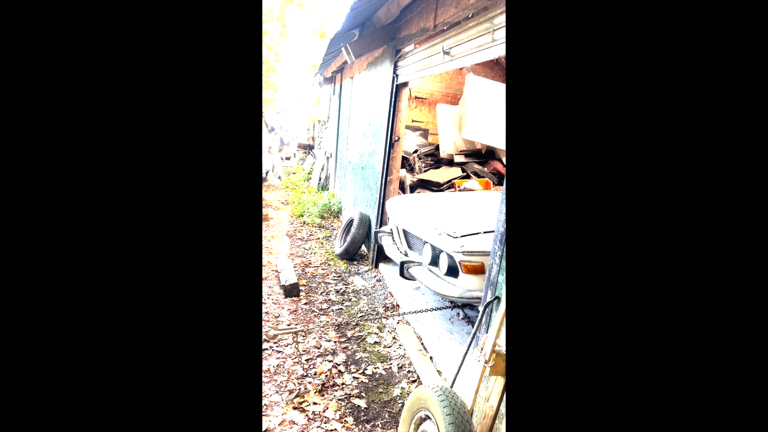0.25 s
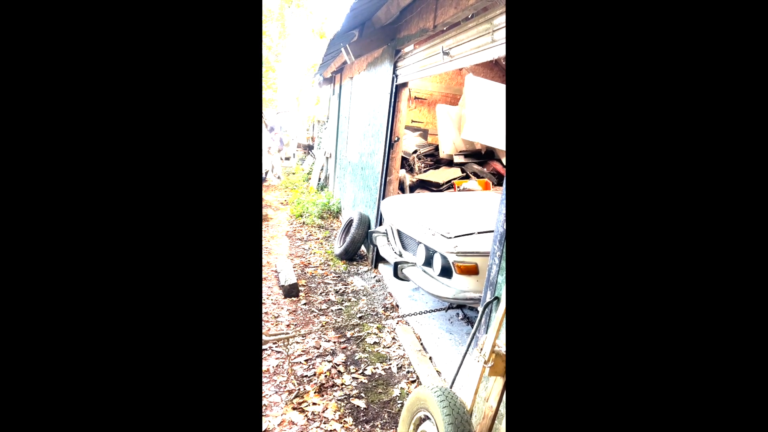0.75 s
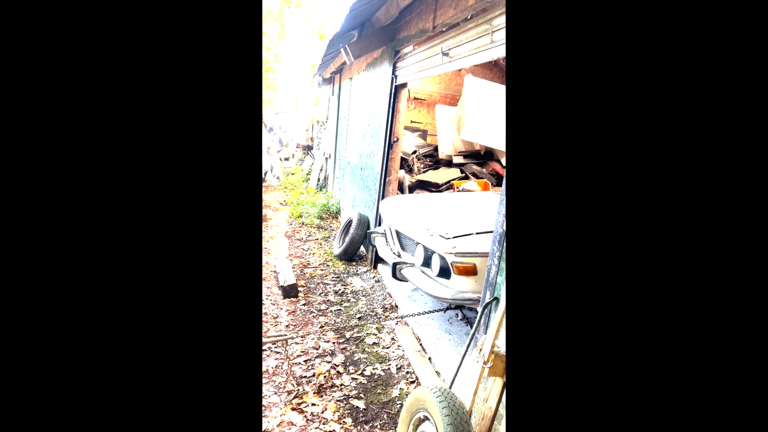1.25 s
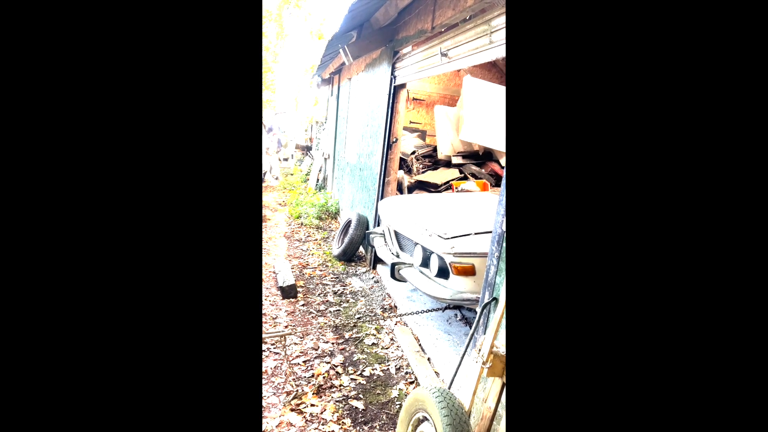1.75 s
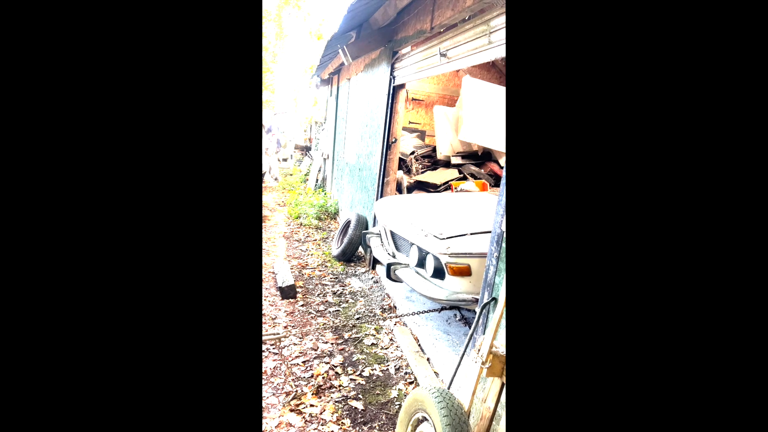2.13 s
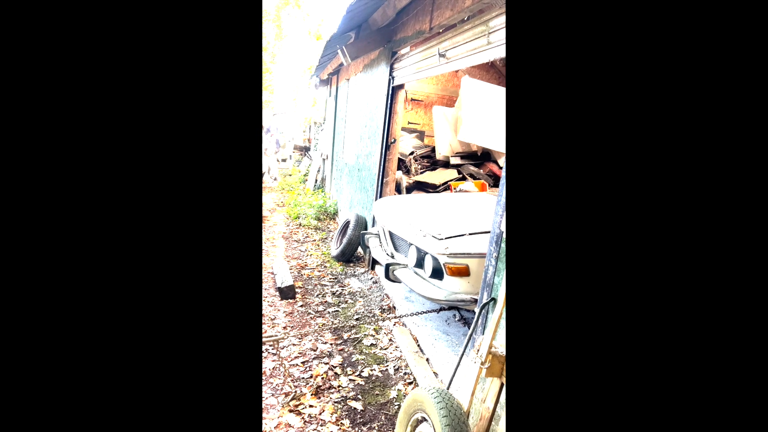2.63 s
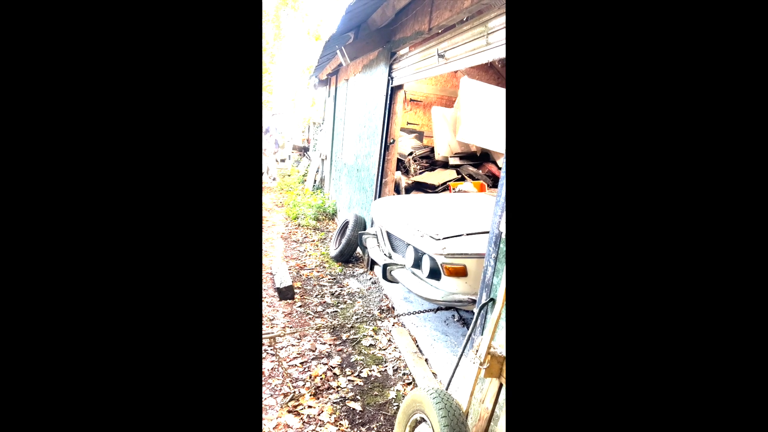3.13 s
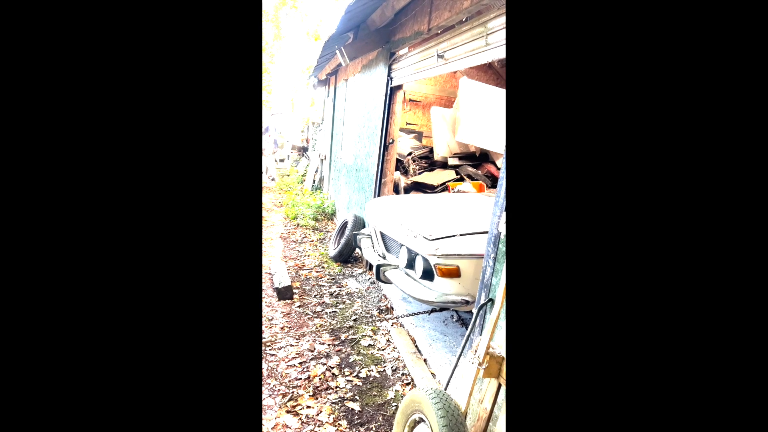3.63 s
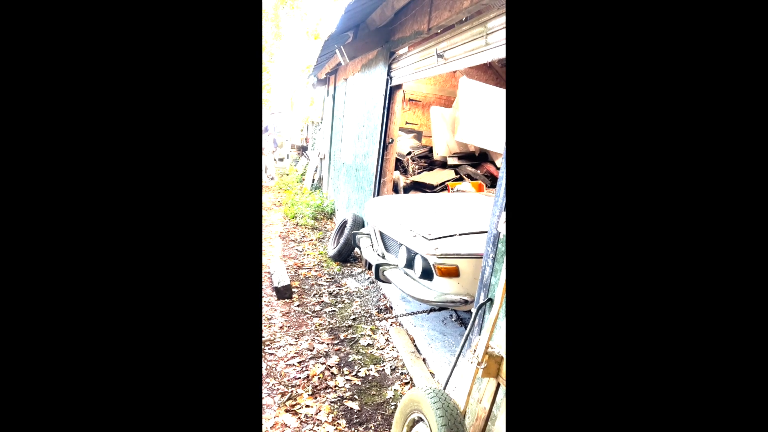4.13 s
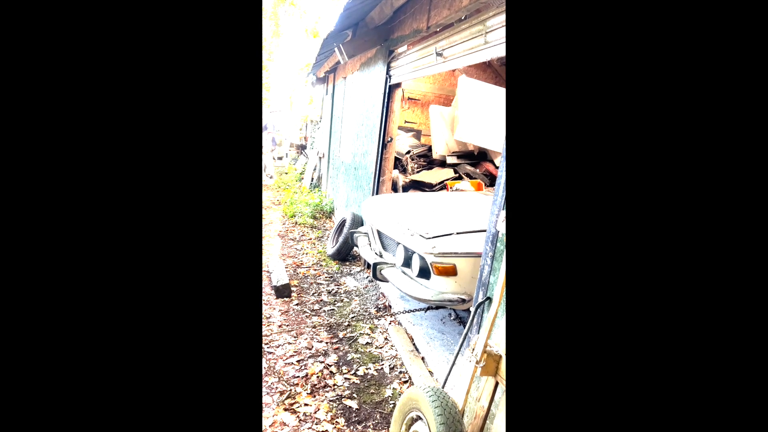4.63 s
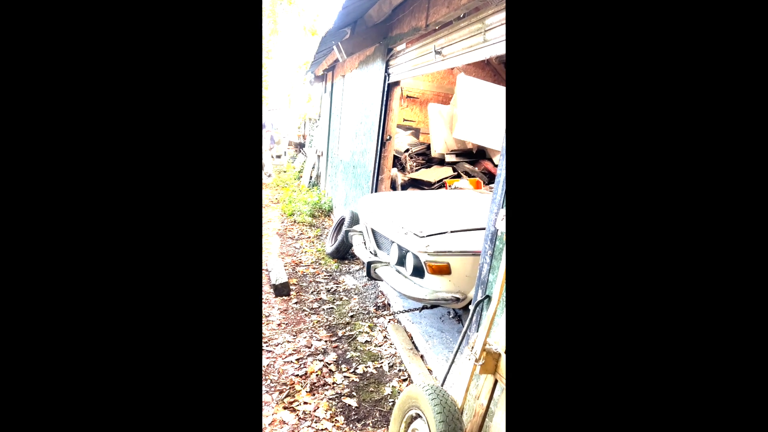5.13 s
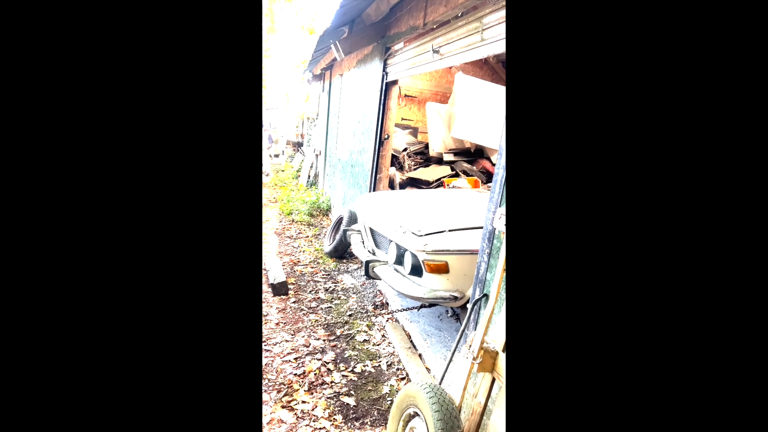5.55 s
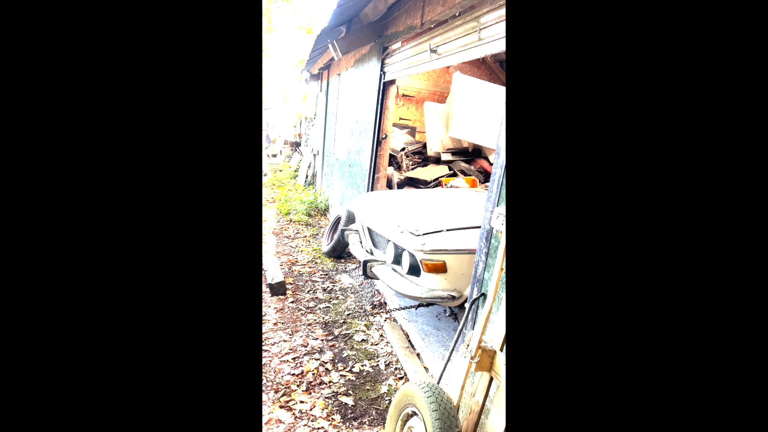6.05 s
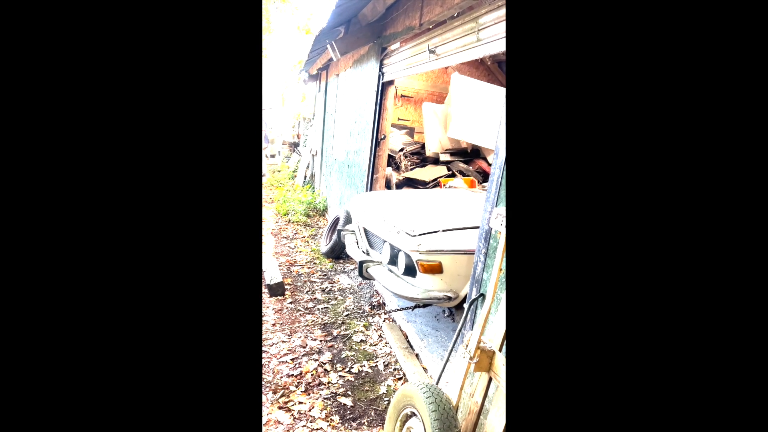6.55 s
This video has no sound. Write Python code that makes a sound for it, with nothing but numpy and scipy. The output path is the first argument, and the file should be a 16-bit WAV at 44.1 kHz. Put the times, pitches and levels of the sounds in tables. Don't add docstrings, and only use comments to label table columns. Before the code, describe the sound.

A low, slightly uneven engine idle hums throughout, with soft valve clatter, and light wind buffets the microphone until about 1.5 s. Close by, a hand winch knocks at 0.06 s and rasps until 0.65 s, gears whining, drum scraping and squealing, with a firm deck thud near 0.5 s and a small creak as it eases. A second stroke runs 1.43-2.05 s, ending in a grinding slip and creak. The third, 2.68-3.45 s, is longer, with dense squealing scrapes, a soft thud at 3.15 s, a bright chain ping at 3.3 s, then knocks and settling creaks. The fourth, 4.2-4.9 s, is harsh, with the hardest deck thud at 4.78 s. The engine hums almost alone until a shorter stroke at 5.83-6.35 s, followed by the strongest creaks, a knock at 6.43 s and faint settling. The open yard adds a short, diffuse reflection.

```python
import sys
import numpy as np
from scipy import signal
from scipy.fft import rfft, irfft, next_fast_len
from scipy.io import wavfile
from scipy.ndimage import uniform_filter1d, map_coordinates

SR = 44100
rng = np.random.default_rng(int(sys.argv[2]) if len(sys.argv) > 2 else 0)


def dump_mix(stems):
    frames = np.atleast_2d(stems).T
    limited = np.clip(frames, -1, 1)
    pcm = np.round(limited * 32767).astype(np.int16)
    wavfile.write(sys.argv[1], SR, pcm)


def attenuation_scalar(level_db):
    decades = np.asarray(level_db, float) / 20
    return 10 ** decades


N = 298998

# (frequency [Hz], density [dB per Hz])
HISS = [(3000, -60), (5000, -2), (6500, -2), (9000, -4.5), (13000, -12.5), (13900, -6), (15600, -26)]
# (frequency [Hz], width [Hz], level [dB])
HOUSING = [(646, 36, 5), (790, 40, 4), (1250, 40, 3), (1380, 40, 6), (1593, 40, 4), (2070, 34, 4),
           (2365, 24, 9), (2450, 30, 6), (2757, 50, 9), (3120, 40, 4), (3620, 50, 6), (4250, 50, 9),
           (4650, 50, 6), (5100, 60, 5)]
# (centre [s], grind [dB], ring over grind [dB], hiss over grind [dB])
SCRAPES = [(.198, -36, -3, -7), (.25, -33, -3.5, -19), (.35, -23.5, -0.5, -15), (.469, -26, 0, -10.5),
           (0.568, -29, 1, -25), (.651, -35, 3.5, -6), (1.779, -35, -2, -21), (1.859, -27.5, -4, -27),
           (1.94, -27.5, -3, -11), (2.87, -30.5, -10, -25), (2.967, -29, -4, -19), (3.039, -33, -3.5, -11),
           (3.137, -22.5, -10, -10), (3.217, -29.5, -0.5, -6), (3.292, -27, 0, -10), (3.371, -25, 0.5, -5),
           (3.486, -34, -0.5, -13), (4.356, -31, -8, -13), (4.482, -26, -2.5, -11), (4.602, -25, -0.5, -15),
           (4.718, -25, -0.5, -6), (4.786, -24, -12, -7), (4.847, -26.5, -0.5, -6.5),
           (6.113, -32.5, -3.5, -13), (6.237, -31.5, -2.5, -26), (6.316, -27.5, -9, -12)]
SCRAPE_S = 0.027


def unit(x):
    return x / np.sqrt(np.mean(x ** 2) + 1e-20)


def along(points, hz):
    f, v = np.transpose(points)
    return np.interp(np.log(hz + 1), np.log(f + 1), v)


def curves(rows, outside=None):
    s, *cols = np.transpose(rows)
    t = np.arange(N) / SR
    return [np.interp(t, s, c, outside, outside) for c in cols]


def wobble(rate):
    coarse = np.arange(0, N + 16, 16)
    knots = rng.standard_normal(int(N * rate / SR) + 4)
    return np.interp(np.arange(N), coarse, map_coordinates(knots, [coarse * rate / SR]))


def filtered(x, response):
    m = next_fast_len(N + SR // 2)
    spectrum = rfft(x, m) * response(np.fft.rfftfreq(m, 1 / SR))
    return irfft(spectrum, m)[..., :N]


def modes(table):
    def mode(f, centre, width, db):
        damping = 1j * f * abs(width)
        return attenuation_scalar(db) * damping / (centre * centre - f * f + damping)
    return lambda f: sum(mode(f, *row) for row in table)


def grit(spectrum, grain_db, rate):
    grains = rng.standard_normal(N) * attenuation_scalar(grain_db * wobble(rate))
    return unit(filtered(grains, lambda f: attenuation_scalar(along(spectrum, f))))


def bursts(centres, lengths, dbs, lag=0, rise=0.5, fall=0.66):
    out, t = np.zeros(N), np.arange(N) / SR
    for s, length, db in zip(centres, lengths, dbs):
        near = slice(max(0, int((s - .1) * SR)), int((s + .25) * SR))
        u = (t[near] - s - lag) / length
        out[near] += attenuation_scalar(db) * np.exp(-(u / np.where(u < 0, rise, fall)) ** 2)
    return out


def breeze():
    # (time [s], level [dB])
    strength = [(0, -52), (.3, -43), (.75, -49), (.9, -44), (1.15, -45.5), (1.4, -55), (2.2, -61), (3, -63),
                (6.78, -70)]
    # (frequency [Hz], density [dB per Hz])
    buffet = [(20, -22), (60, -5), (110, -3), (250, -26), (600, -90)]
    ports = np.array([grit(buffet, grain_db=6, rate=5.68) for port in range(2)])
    return attenuation_scalar(curves(strength)[0]) * ports


def engine():
    # (time [s], firing rate [1/s], exhaust level [dB])
    idle = [(0.0, 32.1, -34.5), (1.04, 32.6, -35), (2.77, 32.4, -35), (2.83, 31.6, -33),
            (4.15, 32.9, -36.5), (4.55, 32.1, -33), (5.53, 32.7, -35.5), (6.78, 32.1, -35)]
    # (multiple of the cycle rate [1], level [dB])
    orders = [(3, -26), (5, -2.5), (6, -7), (8, -22), (9, -5), (12, -8.5), (15, -10), (21, -10), (31, -32),
              (38, -22.5)]
    # (frequency [Hz], density [dB per Hz])
    noise_spectrum = [(30, -13), (60, 0.5), (150, -9), (250, -13), (330, -19), (800, -22.5), (1250, -18),
                      (1800, -27), (3000, -29), (4000, -37.5), (5200, -35), (7000, -47), (13000, -49.5),
                      (15500, -42)]
    # (frequency [Hz], share [1])
    clatter = [(150, .3), (700, .5), (1250, .9), (3000, .5), (6000, .15), (16000, .1)]
    lope_db = 1.5

    firing_hz, level_db = curves(idle)
    exhaust_db = level_db + lope_db * wobble(5)
    cycle = 2 * np.pi * np.cumsum(uniform_filter1d(firing_hz, SR)) / SR / 3
    tones = np.zeros(N)
    for k, db in orders:
        tones += attenuation_scalar(db + 2.3 * wobble(6)) * np.sin(k * cycle + 1.3 * k + .5 * wobble(5))

    firing = np.exp(.45 * np.cos(3 * cycle + .3 * wobble(20)) + .1 * wobble(12))
    share = lambda f: np.clip(along(clatter, f), 0, 1)
    split = lambda f: attenuation_scalar(along(noise_spectrum, f)) * np.sqrt([share(f), 1 - share(f)])
    pair = np.array([unit(firing * rng.standard_normal(N)), rng.standard_normal(N)])
    noise = unit(filtered(pair, split).sum(axis=0))
    return attenuation_scalar(exhaust_db) * tones + attenuation_scalar(-37.5 + 0.24 * (exhaust_db + 34.0)) * noise


def frame():
    # (centre [s], length [s], slip rate [1/s], level [dB])
    creaks = [
        (.675, .04, 503, -41),
        (2.13, .05, 590, -41),
        (3.5, .04, 505, -41),
        (3.6, .1, 598, -48),
        (3.705, .03, 480, -43),
        (6.34, .06, 505, -31),
        (6.46, .05, 575, -35),
        (6.62, .05, 1010, -46),
    ]
    # (frequency [Hz], width [Hz], level [dB])
    joints = [(505, 30, 10), (620, 90, 6), (1040, 150, 3), (1600, 300, 4), (2200, 300, 4), (2980, 460, -8)]
    # (time [s], peak level [dB])
    thuds = [
        (.36, -31),
        (.485, -20.5),
        (3.145, -28.5),
        (4.779, -13),
    ]
    # (frequency [Hz], level [dB], t60 [s])
    deck = [(177, -4, 0.074), (258.4, -1.5, 0.068), (348, -3, 0.096), (1005, -20, 0.091)]

    s, length, hz, db = np.transpose(creaks)
    nearest = np.searchsorted((s[1:] + s[:-1]) / 2, np.arange(N) / SR)
    slip_count = np.floor(np.cumsum(hz[nearest] * (1 + .008 * wobble(60))) / SR)
    slips = np.diff(slip_count, prepend=0) * attenuation_scalar(1.2 * rng.standard_normal(N))
    soft = lambda f: modes(joints)(f) / (1 + 1j * f / 4200) ** 3
    out = bursts(s, length, db) * unit(filtered(slips, soft))

    t = np.arange(SR // 4) / SR
    for start, peak_db in thuds:
        ring = sum(attenuation_scalar(level - 60 * t / t60) * np.sin(2 * np.pi * f * t) for f, level, t60 in deck)
        out[round(start * SR):][:len(t)] += attenuation_scalar(peak_db + 4.5) * ring * (1 - np.exp(-t / 0.0082))
    return out


def chain():
    # (time [s], peak level [dB])
    pings = [
        (0.6764, -47),
        (1.7835, -48),
        (1.9598, -44),
        (2.0441, -45),
        (2.8911, -47),
        (3.3014, -41),
        (4.3625, -50),
        (6.2387, -44),
        (6.4642, -50),
    ]
    # (frequency [Hz], level [dB], t60 [s])
    link = [(13060, 0, .05), (8700, -8, 0.065), (14700, -8, .03)]
    out, t = np.zeros(N), np.arange(SR // 10) / SR
    for start, peak_db in pings:
        ring = np.zeros(len(t))
        for hz, db, t60 in link:
            scatter_db = 3 * rng.standard_normal()
            ring += attenuation_scalar(db + scatter_db - 60 * t / t60) * np.sin(2 * np.pi * hz * t)
        out[round(start * SR):][:len(t)] += attenuation_scalar(peak_db + 3.0) * ring * (1 - np.exp(-t / .0012))
    return out


def pawl():
    # (time [s], peak level [dB], brightness [dB])
    ticks = [(0.064, -25.5, -27), (1.43, -27.5, -28), (2.044, -43, -33), (2.11, -33, -31), (2.25, -35, -33),
             (2.682, -25.5, -23), (3.458, -26, -18), (3.567, -37, -34), (3.679, -35.5, -36),
             (3.944, -42, -33), (4.006, -54, -34), (4.199, -29, -33), (4.28, -29, -35), (5.605, -47, -35),
             (5.827, -30.5, -26), (6.435, -28, -25), (6.683, -46, -34)]
    # (frequency [Hz], density [dB per Hz])
    knock_spectrum = [(400, -16), (900, 5), (1500, -12), (2800, 4), (4500, -6.5), (6500, -13), (10000, -70)]
    s, db, bright_db = np.transpose(ticks)
    knock_env = bursts(s, np.full(len(s), .02), db - 7, rise=.015, fall=0.71)
    click_env = bursts(s, np.full(len(s), .008), db + bright_db + 2, rise=.03, fall=0.98)
    knock = knock_env * grit(knock_spectrum, grain_db=3.5, rate=420)
    return knock + click_env * grit(HISS, grain_db=-10.0, rate=400)


def drum():
    # (centre [s], length [s], grind [dB], ring over grind [dB])
    settles = [
        (2.042, 0.0096, -47, 12),
        (2.127, 0.04, -37.5, -4.5),
        (2.252, 0.054, -53, -5),
        (3.562, 0.048, -46, 0.5),
        (3.686, 0.056, -45, -18),
        (6.445, .026, -37, -2),
        (6.713, 0.038, -67, 21),
    ]
    # (frequency [Hz], width [Hz], level [dB])
    squeal_modes = [(5863, 44, 2.5), (5880, 81, -7.5), (7480, 46, -16), (9450, 30, -10.5), (11300, 60, -22),
                    (12240, 41, -19), (12930, 110, -20), (14900, 200, -17)]
    # (frequency [Hz], width [Hz], level [dB])
    flange_modes = [(3590, 31, 1.5), (3230, 220, -9)]
    # (frequency [Hz], density [dB per Hz])
    grind_spectrum = [(600, -32), (1200, 2), (2000, 10), (2750, 2.5), (3300, -20), (4800, -4), (7000, -8),
                      (10000, -80)]
    settle_hiss_db, squeal_db = -16, -7.5

    loaded = [(s, SCRAPE_S, db, db + ring, db + hiss) for s, db, ring, hiss in SCRAPES]
    slack = [(s, length, db, db + ring, db + settle_hiss_db) for s, length, db, ring in settles]
    s, length, grind_db, flange_db, hiss_db = np.transpose(loaded + slack)
    bite = lambda db: bursts(s - 0.26 * length, length, db, rise=0.37, fall=0.61)
    rub = lambda db: bite(db) * rng.standard_normal(N) * attenuation_scalar(4.8 * wobble(400))

    squeal = attenuation_scalar(21.5) * filtered(rub(flange_db + squeal_db), modes(squeal_modes))
    flange = attenuation_scalar(17.5) * filtered(rub(flange_db), modes(flange_modes))
    grind_env = bursts(s, 0.99 * length, grind_db - 4.0, lag=0.0068)
    grind = grind_env * grit(grind_spectrum, grain_db=1.5, rate=200)
    hiss = bite(hiss_db - 8.0) * grit(HISS, grain_db=8.0, rate=810)
    return squeal + flange + grind + filtered(grind, modes(HOUSING)) + hiss


def gears():
    # (time [s], effort [dB], tooth rate [1/s])
    crank = [
        [(.061, -44, 430), (.09, -31.5, 430), (.197, -25, 440), (.3, -26, 465), (.4, -24.5, 505),
         (.55, -24.5, 480), (.663, -41.5, 510), (.75, -43, 510)],
        [(1.426, -41, 430), (1.5, -26.5, 450), (1.62, -26.5, 494), (1.8, -25.5, 480), (2.0, -26, 495),
         (2.084, -47.5, 465), (2.2, -43, 455)],
        [(2.677, -34, 480), (2.685, -32.5, 464), (2.78, -27, 467), (2.9, -26.5, 473), (3.15, -25.5, 475),
         (3.39, -25, 508), (3.447, -39.5, 420), (3.6, -45, 420)],
        [(4.194, -46, 430), (4.203, -34, 430), (4.318, -25, 452), (4.4, -26, 496), (4.65, -25, 457),
         (4.86, -24, 503), (4.92, -38, 468), (5.05, -52.5, 440)],
        [(5.822, -42.5, 436), (5.874, -29, 470), (5.98, -27, 507), (6.06, -26, 510), (6.2, -25, 460),
         (6.32, -26.5, 498), (6.37, -45, 470), (6.43, -45, 498)],
    ]
    # (multiple of the tooth rate [1], level [dB])
    teeth = [(.322, -9.5), (0.51, -17.5), (1, 0), (4 / 3, -19), (2, -3.5), (3.1, -10.5)]
    # (frequency [Hz], density [dB per Hz])
    body_spectrum = [(100, -10), (200, -9.5), (350, 7.5), (600, 2), (1100, -0.5), (1500, -7.5), (2200, -83),
                     (5000, -80)]
    # (frequency [Hz], density [dB per Hz])
    rasp_spectrum = [(1000, -68), (1700, 1.5), (2200, 0), (2800, -2), (3400, -6), (4500, -12), (5500, -10),
                     (6500, -27), (8000, -36)]
    full_db = -26
    jolt_db = -15.5
    whine_fades_db_per_s, whine_db_per_hz, cruise_hz = 3, 0.0455, 487
    take_up_db, take_up_s = 2.5, 0.048
    whistle_hz, whistle_db = 2935, 1

    effort = sum(attenuation_scalar(curves(stroke, outside=-120)[0]) for stroke in crank)
    over_db = 20 * np.log10(effort) - full_db
    mesh_hz = curves(np.concatenate(crank))[1]
    t = np.arange(N) / SR
    starts = np.array([0] + [stroke[0][0] for stroke in crank])
    since = t - starts[np.searchsorted(starts, t, side='right') - 1]

    rasp = attenuation_scalar(-38 + 1.16 * over_db)
    hiss = attenuation_scalar(-61 + 1 * over_db)
    sing_db = whine_db_per_hz * (mesh_hz - cruise_hz) - whine_fades_db_per_s * since + 4 * wobble(30)
    tone = attenuation_scalar(-29.5 + 1.8 * np.minimum(over_db, 0) + sing_db)

    turn = 2 * np.pi * np.cumsum(mesh_hz * (1 + .014 * wobble(35))) / SR
    whine = np.zeros(N)
    for k, db in teeth:
        whine += attenuation_scalar(db + 1.47 * wobble(40)) * np.sin(k * turn + 0.82 * np.sqrt(k) * wobble(70))
    whistle_phase = 2 * np.pi * whistle_hz * t + 0.36 * wobble(12)
    whistle = rasp * attenuation_scalar(whistle_db + 3 * wobble(16)) * np.sin(whistle_phase)

    rasp = rasp * attenuation_scalar(-take_up_db * np.exp(-since / take_up_s))
    bite = 1 + 0.48 * np.cos(turn)
    s, grind_db = np.transpose(SCRAPES)[:2]
    body = effort + bursts(s, np.full(len(s), SCRAPE_S), grind_db + jolt_db, lag=0.03)
    rattle = attenuation_scalar(-3.5) * body * grit(body_spectrum, grain_db=2, rate=300)
    rattle += attenuation_scalar(3.5) * rasp * bite * grit(rasp_spectrum, grain_db=0.0, rate=300)
    ringing = rattle + filtered(rattle, modes(HOUSING))
    rub = hiss * bite * grit(HISS, grain_db=0.5, rate=500)
    return attenuation_scalar(1.0) * tone * whine + whistle + attenuation_scalar(-2.0) * ringing + attenuation_scalar(6.5) * rub


def yard(x, t60, size):
    z = signal.stft(x, nperseg=size, noverlap=size // 2)[2]
    keep = attenuation_scalar(-60 * size / SR / t60)
    power = signal.lfilter([0, 1 - keep], [1, -keep], abs(z) ** 2, axis=1)
    scattered = np.sqrt(power) * np.exp(2j * np.pi * rng.random(z.shape))
    return unit(signal.istft(scattered, nperseg=size, noverlap=size // 2)[1][:N]) * np.std(x)


def scene():
    # (frequency [Hz], correlation [1])
    alike = [(150, 1), (500, 0.98), (900, 0.81), (2000, 0.89), (2700, 0.81), (3200, 0.68), (4100, 0.22),
             (5200, 0.77), (5900, 0.97), (16000, 1)]
    winch = gears() + drum() + pawl() + frame() + chain()
    near = winch + attenuation_scalar(-6.5) * yard(winch, t60=0.16, size=1024) + engine()
    stray = yard(near, t60=0.045, size=512)
    turn = lambda f: np.arccos(np.clip(along(alike, f), -1, 1)) / 2
    mid, side = filtered(np.array([near, stray]), lambda f: [np.cos(turn(f)), np.sin(turn(f))])
    return np.array([mid + side, mid - side]) + breeze()


def top_cut(x):
    return signal.sosfilt(signal.butter(12, 15700, fs=SR, output="sos"), x)


def record(dry):
    # (frequency [Hz], level [dB])
    left = [(250, 0), (370, .5), (670, 3), (1230, 3.5), (2240, .5), (4100, 0), (7500, -.5), (13700, 0)]
    # (frequency [Hz], phase [rad])
    lead = [(0, 0), (1500, -.1), (2500, 2.6), (3800, 3), (5200, 2.3), (6000, 3.14), (14400, 15.7),
            (16000, 15.8)]
    # (frequency [Hz], level [dB])
    treble = [(13300, 0), (14000, -6), (15700, -17)]
    offset = lambda f: np.log(10) / 20 * along(left, f) + 1j * np.interp(f, *np.transpose(lead))
    halves = np.array([[.5], [-.5]])
    ports = filtered(dry, lambda f: attenuation_scalar(along(treble, f)) * np.exp(halves * offset(f)))
    return top_cut(ports)


dry = scene()
out = record(dry)
dump_mix(out)
```